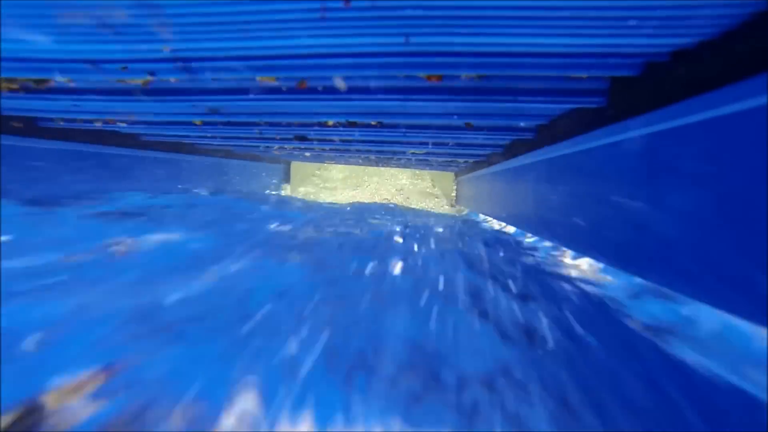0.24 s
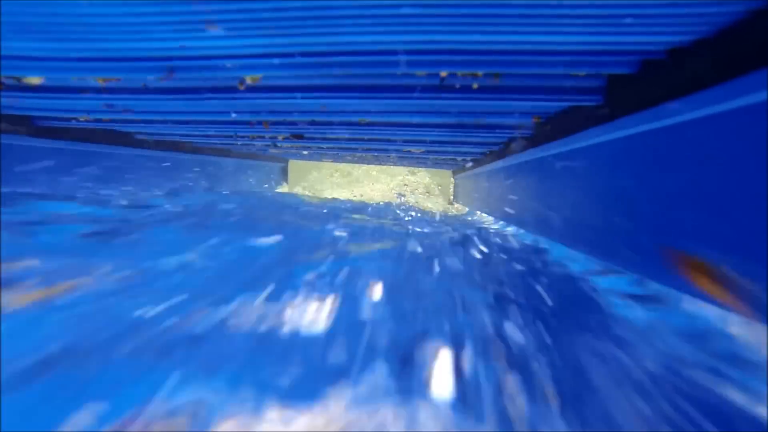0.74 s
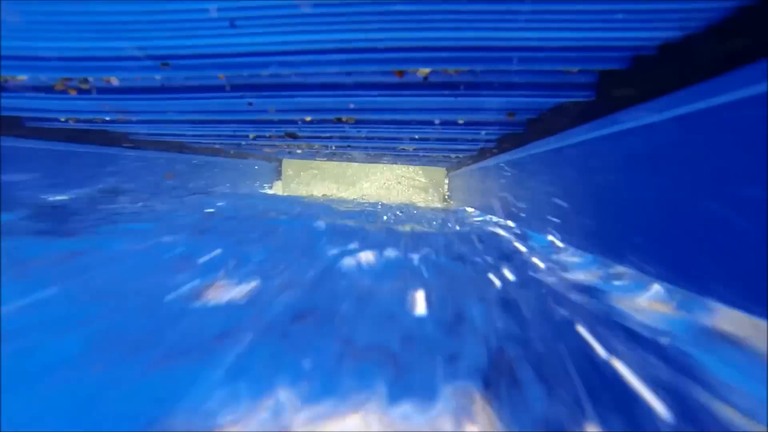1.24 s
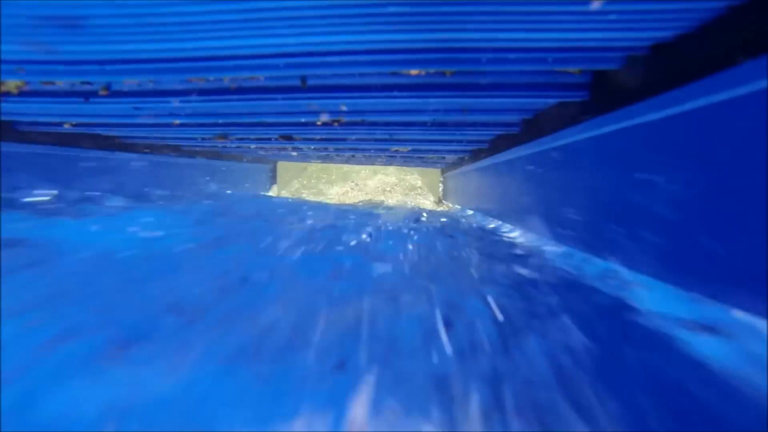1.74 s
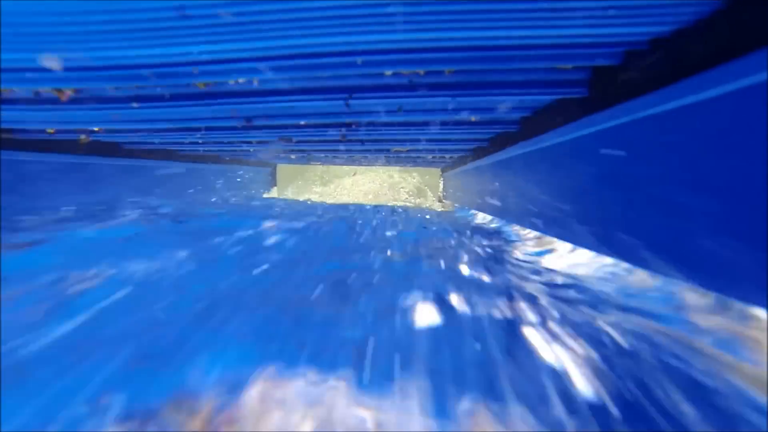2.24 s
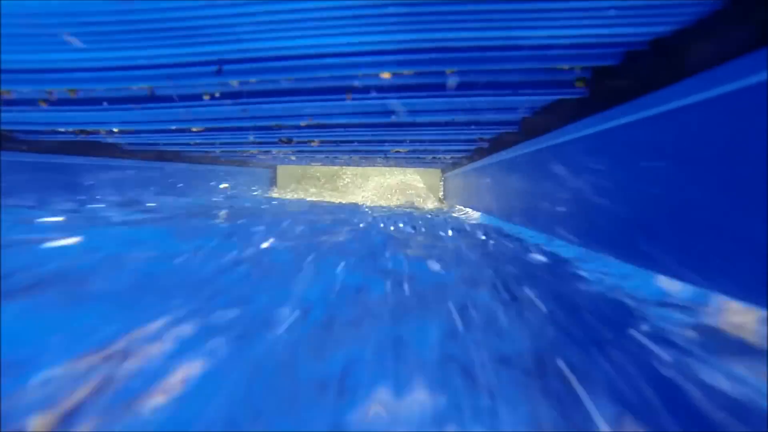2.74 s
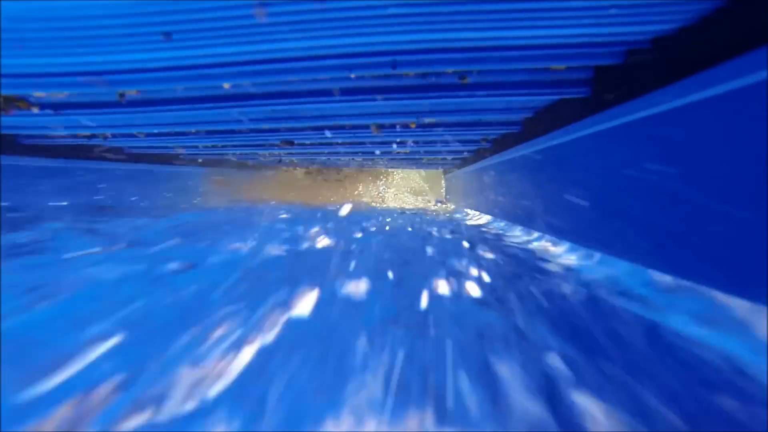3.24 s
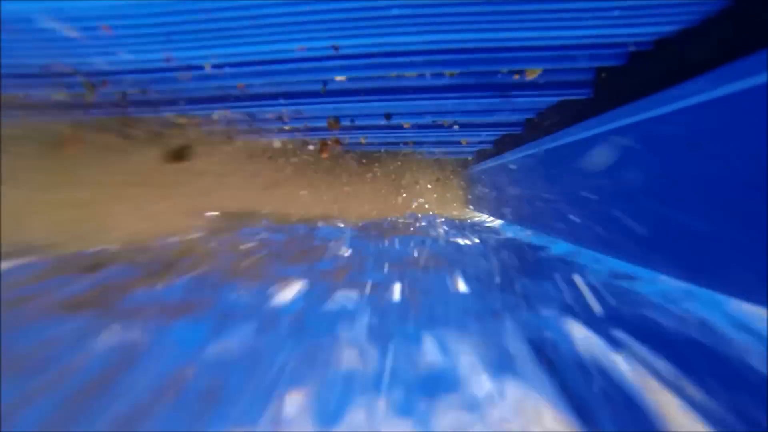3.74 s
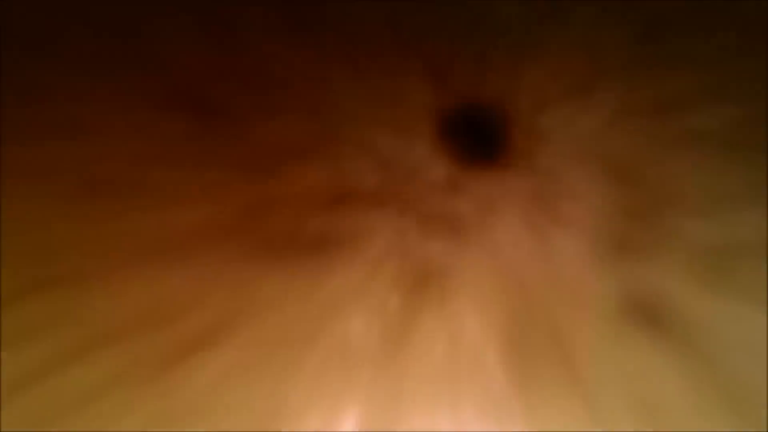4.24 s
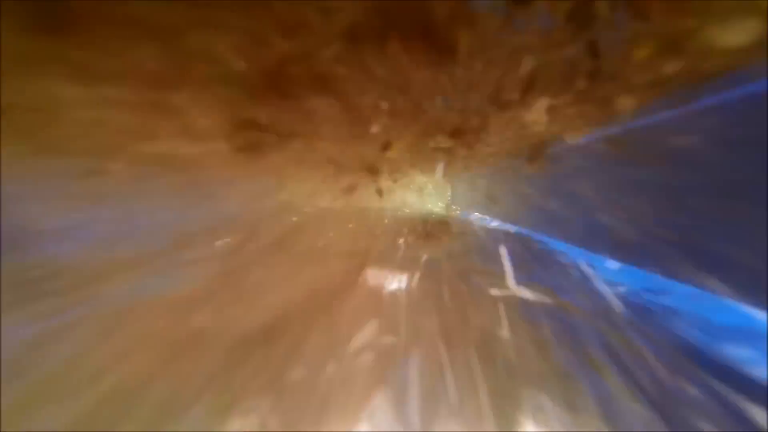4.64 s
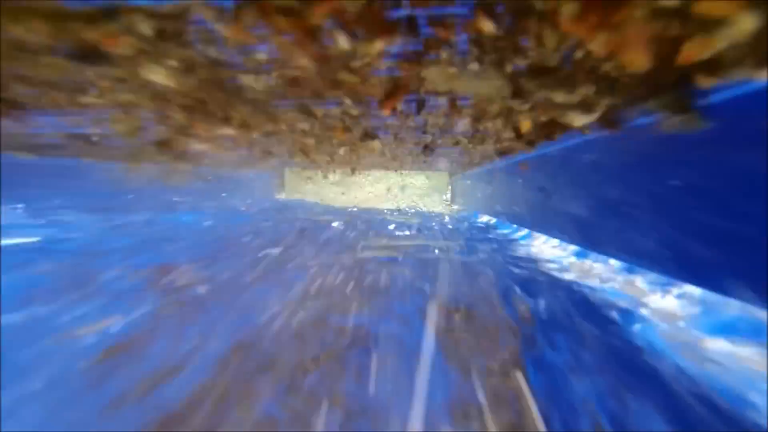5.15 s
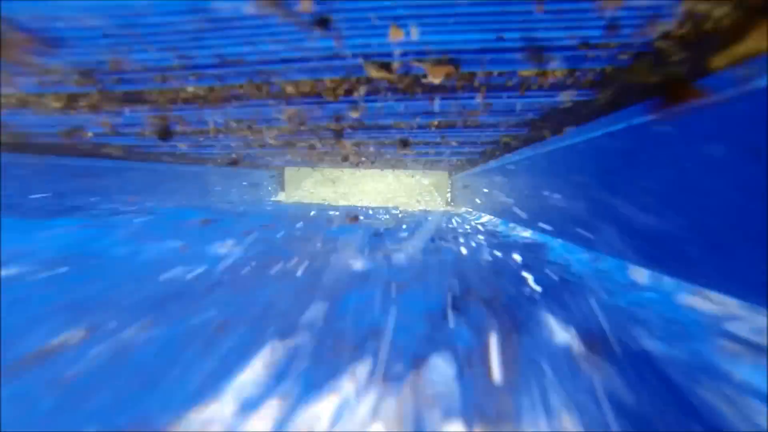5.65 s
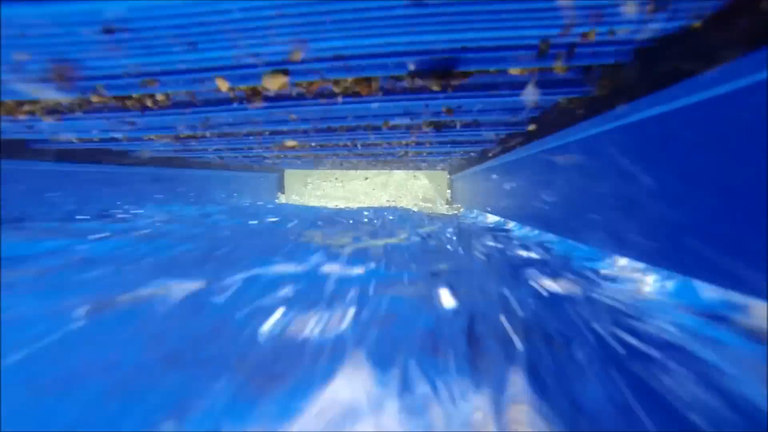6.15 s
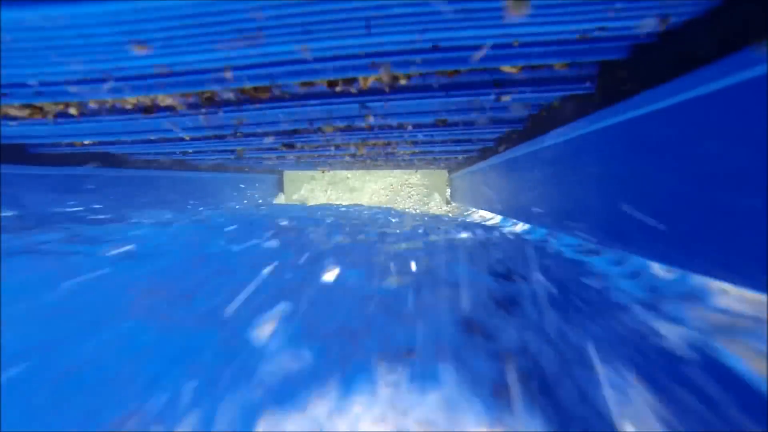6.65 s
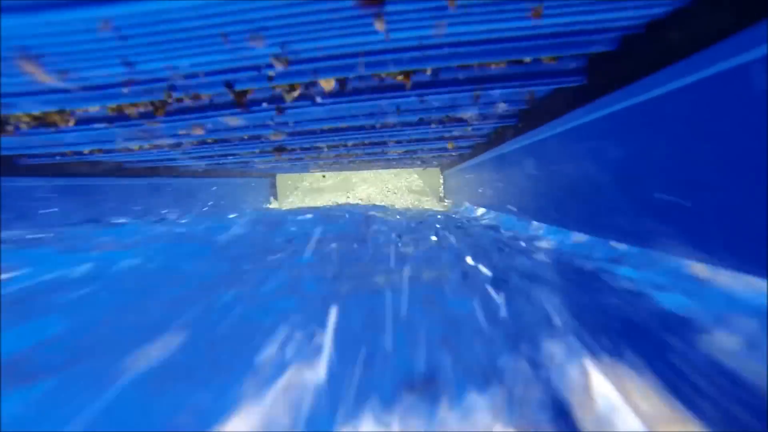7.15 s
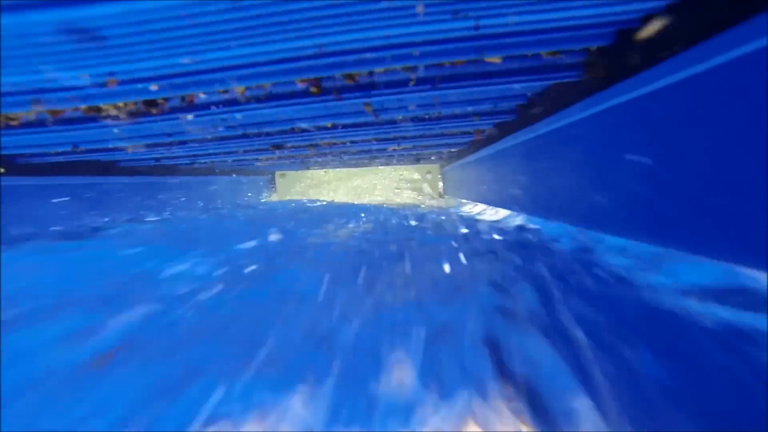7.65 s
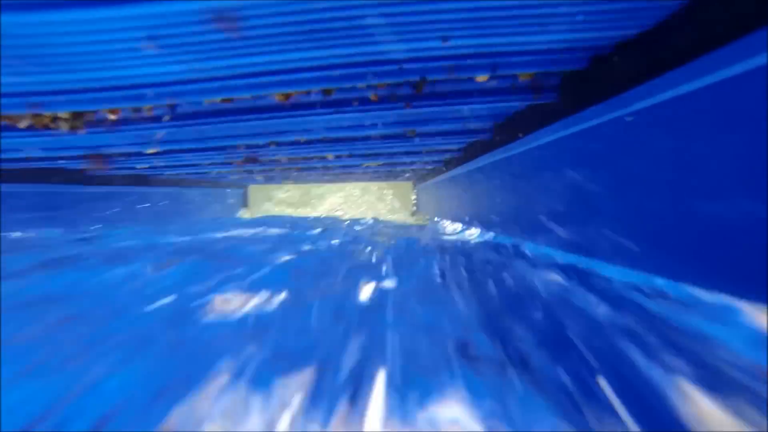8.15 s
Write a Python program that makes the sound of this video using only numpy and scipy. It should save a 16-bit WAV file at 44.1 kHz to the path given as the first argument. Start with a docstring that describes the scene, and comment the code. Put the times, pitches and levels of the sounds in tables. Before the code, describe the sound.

Heard from within a fast shallow stream, bubbles babble and rumble; midway sand ticks, stones crack against the casing, then bubbling resumes.

```python
"""Water races down a plastic sluice box, heard by a camera lying in the stream in a waterproof housing.
From the start, swarms of short ringing bubbles gurgle and fizz, near bubbles plop and noise eddies rumble.
From about 4 s dirt washes past: sand ticks and hisses, grit cracks on the ringing housing, and at 5.8 s a
clod bumps it. After 6 s the sand thins and bubbles lead again, with a few late stones.
Throughout, the camera's limiter ducks the whole mix at loud hits and lets the level climb back."""
import sys
import numpy as np
from scipy import signal
from scipy.fft import rfft, irfft, next_fast_len
from scipy.io import wavfile
from scipy.ndimage import uniform_filter1d, map_coordinates

SR = 44100
rng = np.random.default_rng(int(sys.argv[2]) if len(sys.argv) > 2 else 0)


def generate_wav(sig):
    """Save sig (samples, or channels by samples) to the path in sys.argv[1] as 16-bit PCM at SR."""
    pcm = np.round(np.clip(np.atleast_2d(sig).T, -1, 1) * 32767).astype(np.int16)
    wavfile.write(sys.argv[1], SR, pcm)


N = 370437


def amp(db):
    """Decibels to gain."""
    return 10 ** (np.asarray(db) / 20)


def unit(x):
    """x at rms 1."""
    return x / np.sqrt(np.mean(x ** 2) + 1e-20)


def peaked(x):
    """x at peak 1."""
    return x / np.abs(x).max()


def curves(rows):
    """One value per sample for each column after the time."""
    s, *cols = np.transpose(rows)
    return [np.interp(np.arange(N) / SR, s, c) for c in cols]


def wobble(knots_per_s):
    """A smooth random curve through normally distributed knots."""
    knots = rng.standard_normal(int(N * knots_per_s / SR) + 4)
    return map_coordinates(knots, [np.arange(N) * knots_per_s / SR])


def coloured(x, spectrum):
    """x through a causal minimum-phase filter with the given (Hz, dB) points."""
    size = 2 * next_fast_len(len(x))
    hz, db = np.transpose(spectrum)
    gain = amp(np.interp(np.log(np.fft.rfftfreq(size, 1 / SR) + 1), np.log(hz), db))
    # folding the cepstrum onto positive times makes the filter causal
    cepstrum = irfft(np.log(gain))
    cepstrum[1:size // 2] *= 2
    cepstrum[size // 2 + 1:] = 0
    response = np.exp(rfft(cepstrum))
    return irfft(rfft(x, size) * response)[:len(x)]


def add(track, s, sound):
    """Mix a sound into the track at s seconds."""
    part = track[max(round(s * SR), 0):][:len(sound)]
    part += sound[:len(part)]


def ring(cycles, life_cycles, onset_cycles, rise):
    """A damped oscillation: it swells, dies away and, if rise > 0, climbs in pitch."""
    tone = np.sin(2 * np.pi * cycles * (1 + rise * cycles))
    swell = 1 - np.exp(-(cycles / onset_cycles) ** 2)
    return tone * np.exp(-cycles / life_cycles) * swell


def swarm(per_s, low_hz, high_hz, life_cycles, spread_db, onset_cycles, cap=2.57):
    """Random ringing grains, per_s a second; gain proportional to pitch flattens the spectrum; rms 1."""
    when, place, size, damping, phase = rng.random((int(per_s * N / SR), 5)).T
    hz = low_hz * (high_hz / low_hz) ** place
    lives = life_cycles * 2 ** (2 * damping - 1)
    # many are faint, a few loud; spread_db sets how much they differ
    loudness_db = spread_db * np.minimum(-np.log(1 - size), 2 * cap)
    gain = hz * amp(loudness_db) * np.sign(phase - .5)
    # all grains laid end to end, each cut 40 dB down, then summed at their times
    lengths = (np.log(100) * lives / hz * SR).astype(int) + 1
    grain = np.repeat(np.arange(len(hz)), lengths)
    age = np.arange(len(grain)) - (np.cumsum(lengths) - lengths)[grain]
    waves = gain[grain] * ring(age * hz[grain] / SR, lives[grain], onset_cycles, rise=0.00082)
    start = (when * N).astype(int)
    return unit(np.bincount(start[grain] + age, waves, N)[:N])


def housing(x, tail_db=-13, tail_s=0.0016):
    """Sharp sounds rattle on in the plastic shell: a decaying noise tail of a few milliseconds."""
    t = np.arange(SR // 60) / SR
    tail = rng.standard_normal(len(t)) * np.exp(-t / tail_s)
    tail /= np.linalg.norm(tail)
    return x + amp(tail_db) * signal.fftconvolve(x, tail)[:len(x)]


def surges():
    """Swing of the flow in dB: quick random churning plus bell-shaped gushes of extra water."""
    # Each row: centre in seconds, width between 1/e points in seconds, peak in dB.
    gush_rows = [(0.16, 0.055, 4.5), (0.85, 0.06, 3.5), (4.44, 0.051, 2.5), (5.422, 0.066, 2),
                 (6.97, 0.07, 1), (7.424, 0.13, 1.5), (7.963, 0.094, 3.5)]
    t = np.arange(N) / SR
    gushes_db = sum(db * np.exp(-(2 * (t - s) / width_s) ** 2) for s, width_s, db in gush_rows)
    churn_db = 0.83 * wobble(16) + 1.1 * wobble(60) + 1.0 * wobble(170)
    return gushes_db + churn_db


def spray(level_db=-55):
    """Spray farther down the box blends into an even hiss of filtered noise."""
    return amp(level_db) * unit(coloured(rng.standard_normal(N), [(3000, 1), (14000, -16)]))


def eddies(surge_db):
    """Turbulent pressure on the case: low noise that follows the surges and wavers by itself."""
    # Turbulence. Each row: time in seconds, relative level in dB.
    eddy_rows = [(0.0, -27.5), (0.15, -26.5), (1.8, -25), (1.95, -30.7), (3.3, -24.5), (4.05, -27.1),
                 (4.2, -23), (4.65, -32.0), (4.95, -28.2), (5.1, -33.5), (5.55, -31), (5.7, -24),
                 (6.0, -29), (6.15, -25.5), (6.45, -22.5), (6.6, -26.5), (7.65, -24.5), (8.4, -31.9)]
    # Rumble colour. Each row: frequency in Hz, relative gain in dB.
    rumble_colour = [(8, -5), (22, 1), (50, 0), (100, -8), (200, -14), (400, -31), (900, -56), (3000, -92)]
    level_db, = curves(eddy_rows)
    rumble = unit(coloured(rng.standard_normal(N), rumble_colour))
    return rumble * amp(level_db + 1.55 + surge_db + 1.3 * wobble(14))


def clod():
    """A soft, gritty lump gives the case one push: a noisy pulse peaking near 1 ms, high-passed."""
    # Bump on the case: start in seconds, pulse level in dB ahead of the high-pass.
    start_s, level_db = (5.773, 8.3)
    u = np.arange(SR // 10) / SR / 0.001
    push = u * np.exp(1 - u) * (1 + 0.11 * rng.standard_normal(len(u)))
    highpass = signal.butter(1, 25, "high", fs=SR, output="sos")
    track = np.zeros(N)
    add(track, start_s, -amp(level_db) * signal.sosfilt(highpass, push))
    return track


def grit(crack_s=0.0006):
    """Each stone cracks on the housing, a noise burst, and the wall rings for a few cycles."""
    # Stones. Each row: time in seconds, peak of the dry ring in dB, ring in Hz, crack over ring in dB.
    stone_rows = [(4.059, -2, 1360, -6), (4.352, 0, 1500, 6), (4.676, 3, 1540, 6.5),
                  (4.875, 1.5, 1530, -7.5), (4.955, -1.5, 1500, 12), (4.967, 2, 1230, -4),
                  (4.976, 8, 1360, -6), (4.99, 4, 1440, -2), (5.039, 9, 1290, -5), (5.066, 9, 1470, -11),
                  (5.08, 6.5, 1460, -6), (5.22, -2, 1490, 1.5), (5.266, 3, 1550, -3.5),
                  (5.412, -1.5, 1390, 4.5), (5.433, -9, 1480, 3), (5.468, 0, 1470, 2.5),
                  (5.477, -1.5, 1570, -1), (5.513, -1.5, 1030, 10), (5.638, 5, 1520, -1.5),
                  (5.677, 4, 2000, -1.5), (5.703, 14, 1176, -2), (5.742, 11.5, 1560, -9),
                  (5.774, 7, 1500, 3.5), (5.782, 2, 1500, -7), (5.802, -1, 1700, 2), (5.9, 3.5, 1590, -0.5),
                  (5.948, 2.5, 1650, -0.5), (5.965, 6, 1630, -2), (7.036, 3, 1470, -3),
                  (7.061, 7.5, 1510, -2.5), (8.253, 0.5, 1510, -1), (8.356, 2, 1460, -6.5)]
    # Crack colour. Each row: frequency in Hz, relative gain in dB.
    crack_colour = [(300, -23), (1200, -3), (3300, 6), (5000, -3.5), (8000, -11), (13000, -21.5),
                    (15500, -31)]
    track, t = np.zeros(N), np.arange(SR // 40) / SR
    for s, db, hz, crack_db in stone_rows:
        crack = coloured(rng.standard_normal(len(t)) * np.exp(-t / crack_s), crack_colour)
        wall = peaked(ring(hz * t, life_cycles=2.13, onset_cycles=0.53, rise=0))
        add(track, s - .0005, amp(db) * (amp(crack_db) * peaked(crack) + wall))
    return track


def sand(silt_db=-16):
    """Fine grains tick and chink on the housing, in flurries, over the noise hiss of silt."""
    # Sand colour inside the housing. Each row: frequency in Hz, relative gain in dB.
    sand_colour = [(300, -27.5), (900, -1.5), (1500, 1.5), (2000, -1.5), (2700, -6.5), (3250, -2.5),
                   (4200, -11.5), (4900, -12.5), (6700, -18), (7800, -21), (9600, -25.5), (13000, -31),
                   (15500, -31)]
    count = int(2000 * N / SR)
    when, size = rng.random((count, 2)).T
    force = amp(7.0 * np.minimum(-np.log(1 - size), 4.0)) * rng.choice([-1, 1], count)
    ticks = unit(np.bincount((when * N).astype(int), force, N)[:N])
    chinks = swarm(per_s=2500, low_hz=1206, high_hz=15200, life_cycles=1.7, spread_db=6.5,
                   onset_cycles=0.77, cap=1.9)
    grains = ticks + amp(-9.5) * chinks + amp(silt_db) * rng.standard_normal(N)
    flurries_db = 3.8 * wobble(220)
    return unit(coloured(grains, sand_colour)) * amp(8.0 + flurries_db)


def big_bubbles(splash_db=-19):
    """Bubbles beside the case swell and ring for a few cycles, amid the churn of their splash."""
    # Near bubbles. Each row: time in seconds, peak of the ring in dB, starting pitch in Hz.
    bubble_rows = [(0.082, 1.5, 1320), (0.171, 8, 1170), (0.259, 3.5, 1410), (0.362, -9.5, 454),
                   (0.378, -1, 2280), (0.466, -1.7, 1330), (0.598, -2.5, 1420), (0.666, -3.8, 1100),
                   (0.868, 3.5, 1280), (1.045, 6, 1240), (1.165, -1.5, 2600), (1.208, 5.0, 1430),
                   (1.355, 0.5, 1270), (1.472, 3, 1240), (1.601, -4, 2460), (1.645, 0.5, 1340),
                   (1.733, 3.5, 1210), (1.895, 1.5, 1590), (1.939, -0.5, 1030), (2.035, 5, 980),
                   (2.188, 3, 880), (2.232, -0.5, 1280), (2.273, -3, 760), (2.315, -3, 950),
                   (2.403, -2, 1320), (2.647, -1.5, 2600), (2.726, 1.5, 825), (2.886, -4, 2520),
                   (2.951, 3, 1150), (3.036, -1.5, 1620), (3.075, -18.5, 7300), (3.096, 0.6, 1030),
                   (3.128, 0.7, 1490), (3.21, -3.2, 2380), (3.411, 3, 1410), (3.526, -0.5, 700),
                   (3.628, 5.5, 1480), (3.758, -4, 2850), (3.862, -6, 2320), (3.991, -2, 1130),
                   (4.081, 1.5, 1730), (4.326, 3.2, 1440), (4.573, 5.5, 1650), (6.099, -7, 3840),
                   (6.386, -6, 3500), (6.425, 5.5, 1410), (6.495, 3.3, 1270), (6.631, 2.9, 910),
                   (6.827, 3, 950), (6.988, -7, 2520), (7.244, 5.5, 1010), (7.569, 7.5, 1110),
                   (7.727, 5.5, 1150), (7.801, 4.5, 860), (7.987, 7, 1000), (8.103, 5.2, 1350),
                   (8.306, -3, 2850)]
    track, t = np.zeros(N), np.arange(SR // 30) / SR
    for s, db, hz in bubble_rows:
        life_cycles = 1.3 * amp(rng.standard_normal()) * (hz / 1200) ** 0.64
        blip = peaked(ring(hz * t, life_cycles, onset_cycles=0.89, rise=0.00082))
        add(track, s - .0008, amp(db) * blip * rng.choice([-1, 1]))
        # noise centred on the bubble's pitch, swelling and fading around its onset
        colour = [(hz / 4, -12), (hz, 0), (2 * hz, -8), (4 * hz, -25), (10 * hz, -45)]
        splash = unit(coloured(rng.standard_normal(len(t)), colour))
        add(track, s - .008, amp(db + splash_db) * splash * np.exp(-np.abs(t - .009) / 0.0029))
    return track


def fizz():
    """Tiny bubbles ping high and briefly, in spattering clumps."""
    # Fizz colour inside the housing. Each row: frequency in Hz, relative gain in dB.
    fizz_colour = [(1500, -7.5), (2400, -4), (2850, -1), (3300, 0), (3900, -7), (5200, -9.5), (6500, -18),
                   (7800, -16), (9500, -27.5), (11000, -25.5), (13200, -27), (15500, -47)]
    pings = swarm(per_s=3600, low_hz=1902, high_hz=15150, life_cycles=4.1, spread_db=5.5,
                  onset_cycles=1.0, cap=2.44)
    clumps_db = 1.7 * wobble(70) + 2.3 * wobble(260)
    bed = pings + amp(-30) * rng.standard_normal(N)
    return unit(coloured(bed, fizz_colour)) * amp(5.0 + clumps_db)


def gurgle(dirt):
    """Mid-sized bubbles babble over a noise wash; the large, hollow ones thin out in muddy water."""
    # Colours of the babble and of the large bubbles. Each row: frequency in Hz, relative gain in dB.
    babble_colour, hollow_colour = [(90, -19), (260, -14), (450, -8.5), (620, -9), (850, -4.5), (1150, 0.5),
                                    (1480, 1), (1950, -11), (2300, -9), (2800, -20.5), (3250, -15.5),
                                    (3900, -31.5), (6500, -43), (15000, -68)], [(120, -7.5), (270, -7.5), (420, -3.5), (600, -4.5),
                                                    (820, 2), (1300, -12)]
    babble = swarm(per_s=2600, low_hz=220.2, high_hz=4260, life_cycles=2.33, spread_db=3.0,
                   onset_cycles=0.63, cap=2.52)
    wash = rng.standard_normal(N)
    glugs = swarm(per_s=450, low_hz=132, high_hz=1203, life_cycles=1.14, spread_db=4.0,
                  onset_cycles=0.81, cap=1.96)
    bright = amp(0.5) * unit(coloured(babble + amp(-5) * wash, babble_colour))
    hollow = amp(-5.5) * (1 - dirt) * unit(coloured(glugs, hollow_colour))
    return bright + hollow


def stream():
    """Gurgle, treble and eddies share each surge; dirt crossfades the treble from fizz to sand in power."""
    # Gurgle, then fizz and sand together. Each row: time in seconds, relative level in dB.
    flow_rows, treble_rows = [(0.0, -19.5), (0.2, -16.5), (2.2, -18.5), (4.4, -15.5), (4.8, -19.0),
                              (5.0, -19), (5.2, -22), (5.6, -18.5), (5.8, -17), (6.2, -16.5), (7.8, -15.5),
                              (8.0, -15), (8.2, -21), (8.4, -16)], [(0.0, -47), (0.15, -39.5), (0.3, -40.7), (1.2, -36.5),
                                            (1.5, -41), (1.65, -32.5), (1.8, -41.5), (2.55, -39.3),
                                            (3.45, -37), (3.75, -45), (3.9, -36.5), (4.8, -28.5),
                                            (5.55, -37.5), (5.7, -32.5), (5.85, -32.5), (6.45, -33.5),
                                            (6.6, -37), (8.4, -35.5)]
    # Dirt in the water. Each row: time in seconds, sand's share of the treble 0-1.
    dirt_rows = [(0, 0.07), (3.8, 0.02), (4.2, 0.64), (4.7, 0.92), (5.8, 0.88), (6.2, 0.27), (8.4, 0.2)]
    gurgle_db, = curves(flow_rows)
    treble_db, = curves(treble_rows)
    dirt, = curves(dirt_rows)
    surge_db = surges()
    treble = housing(np.sqrt(1 - dirt) * fizz() + np.sqrt(dirt) * sand())
    low = gurgle(dirt) * amp(gurgle_db - 0.84 + surge_db)
    high = treble * amp(treble_db + 1.3 * surge_db)
    return low + high + spray() + eddies(surge_db)


def scene():
    """Everything that reaches the one microphone in the housing."""
    stones = housing(grit(), tail_db=-9.5, tail_s=0.0022)
    return (stream() + big_bubbles() + stones + clod())[None]


def record(dry, full_scale=0.97, knee=10, top_hz=16000):
    """An overload clips until the limiter has ducked, and the gain comes back slowly; then the band limit."""
    ceiling_db, duck_s, recovery_db_per_s = 0.5, 0.00088, 42.5
    # the limiter senses power averaged over 32 samples, so the thinnest ticks only clip
    power = 2 * np.abs(uniform_filter1d(dry ** 2, size=32))
    over_db = np.maximum(10 * np.log10(power + 1e-12) - ceiling_db, 0)
    # a running maximum against a ramp: instant attack, linear recovery in dB
    regained_db = recovery_db_per_s * np.arange(N) / SR
    wanted_db = np.maximum.accumulate(over_db + regained_db, axis=-1) - regained_db
    lag = np.exp(-1 / (duck_s * SR))
    duck_db = signal.lfilter([1 - lag], [1, -lag], wanted_db)
    x = dry * amp(-duck_db)
    x = x / (1 + np.abs(x / full_scale) ** knee) ** (1 / knee)
    passband = np.clip((top_hz - np.fft.rfftfreq(N, 1 / SR)) / 1500, 0, 1)
    return irfft(rfft(x) * passband, N)


dry = scene()
out = record(dry)
generate_wav(out)
```